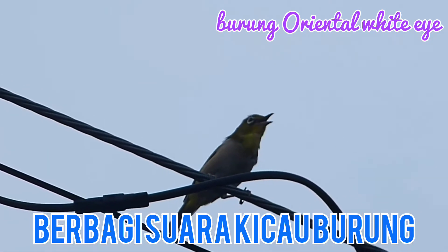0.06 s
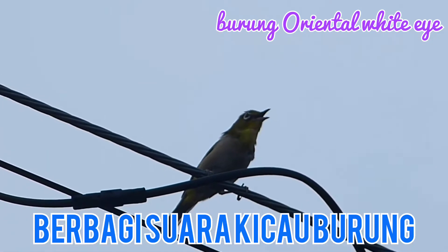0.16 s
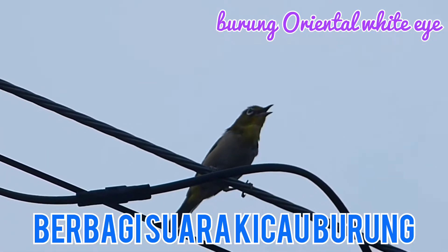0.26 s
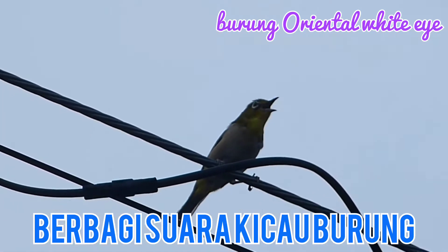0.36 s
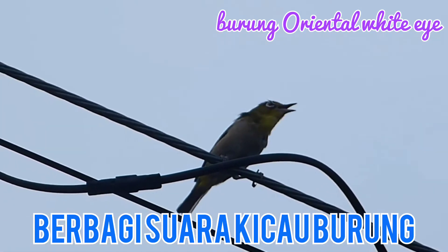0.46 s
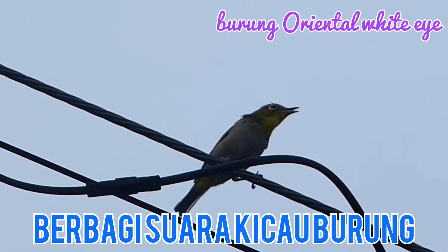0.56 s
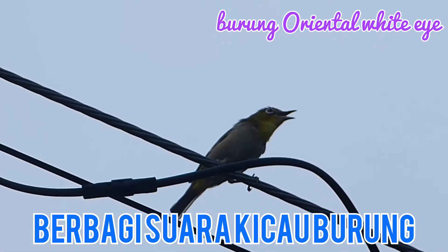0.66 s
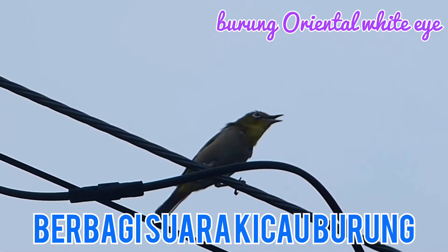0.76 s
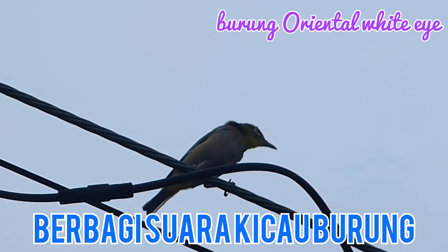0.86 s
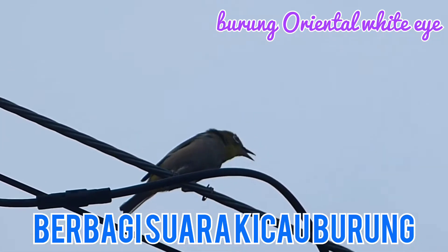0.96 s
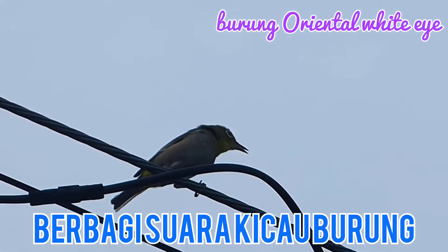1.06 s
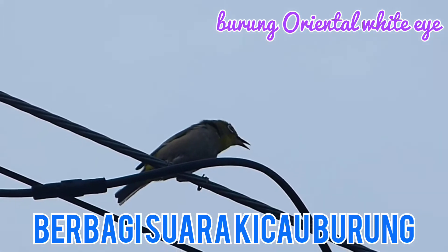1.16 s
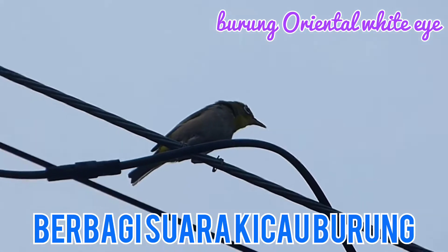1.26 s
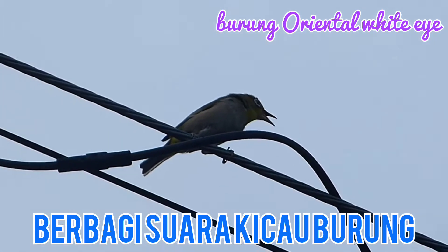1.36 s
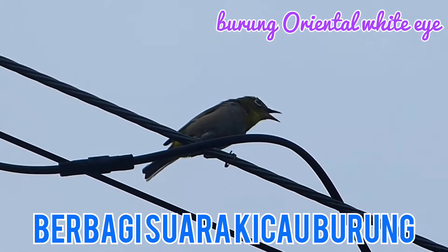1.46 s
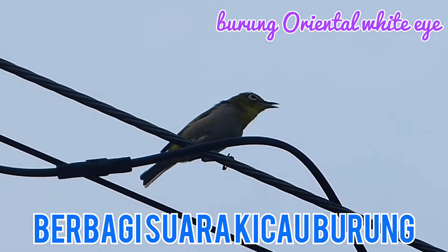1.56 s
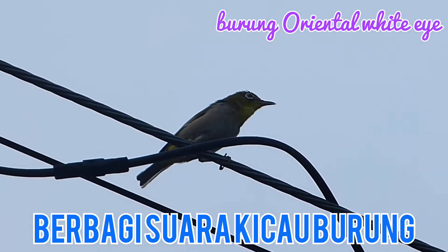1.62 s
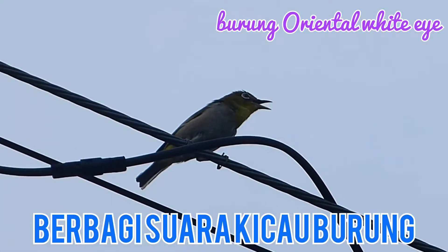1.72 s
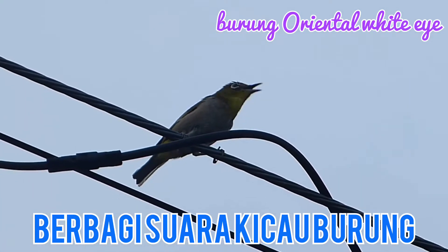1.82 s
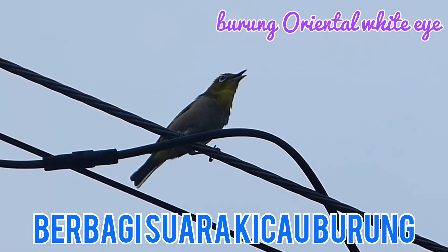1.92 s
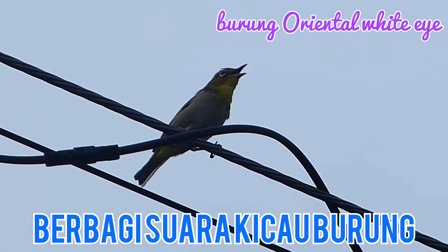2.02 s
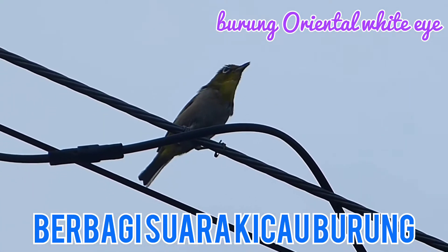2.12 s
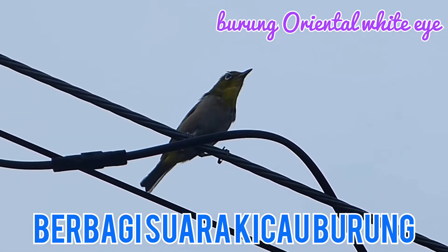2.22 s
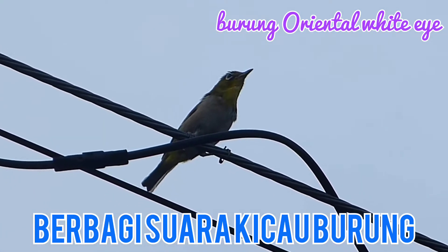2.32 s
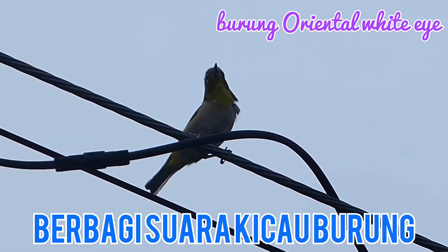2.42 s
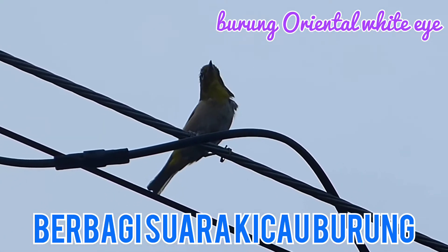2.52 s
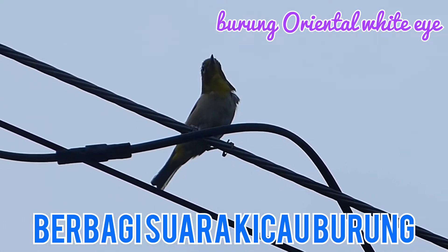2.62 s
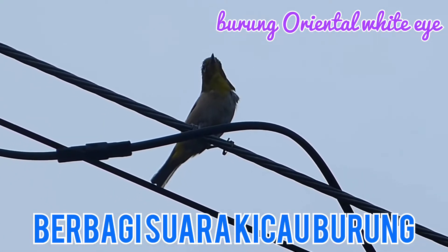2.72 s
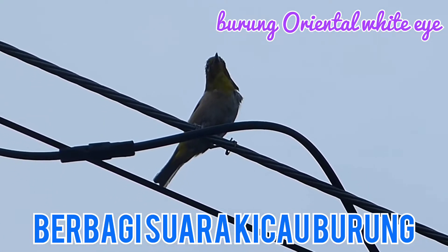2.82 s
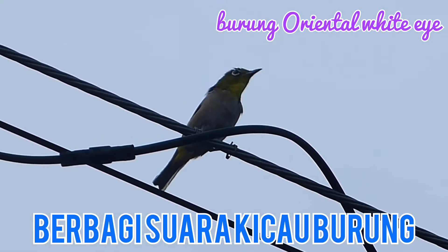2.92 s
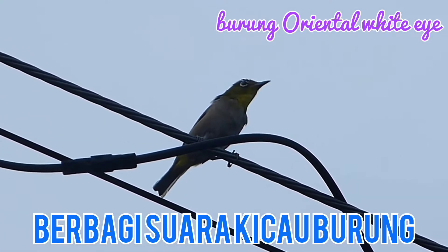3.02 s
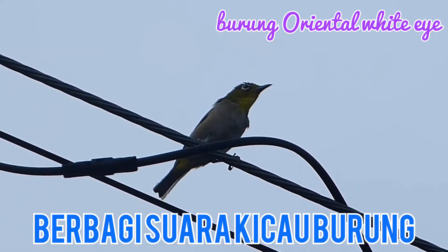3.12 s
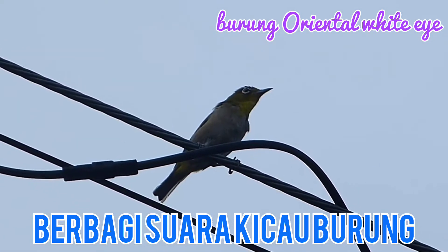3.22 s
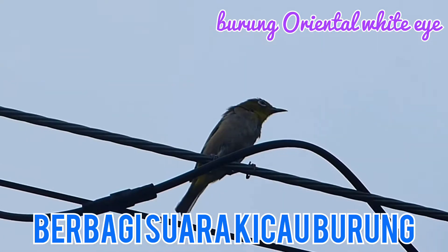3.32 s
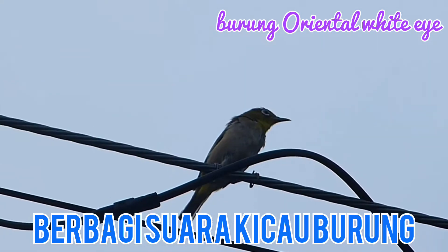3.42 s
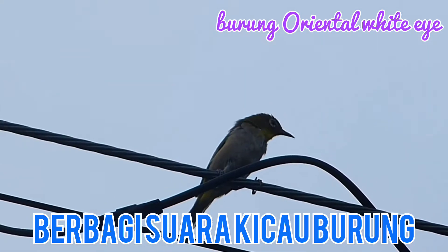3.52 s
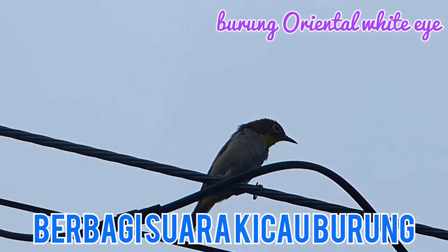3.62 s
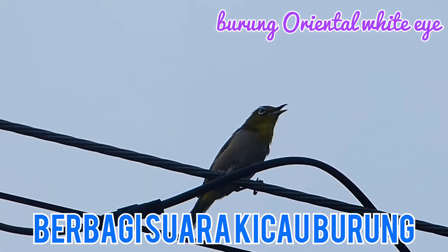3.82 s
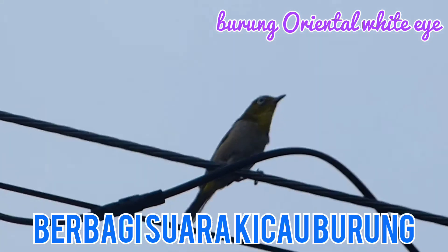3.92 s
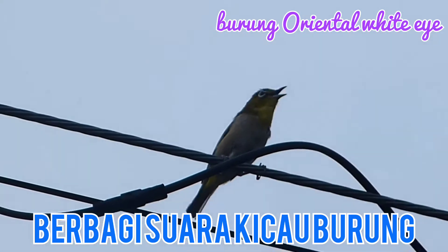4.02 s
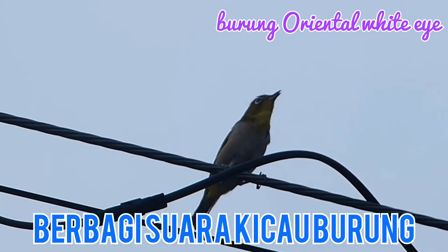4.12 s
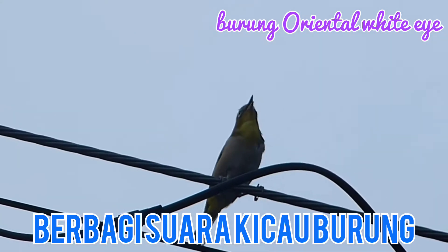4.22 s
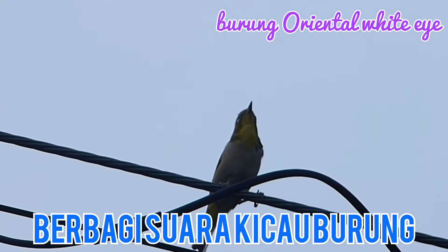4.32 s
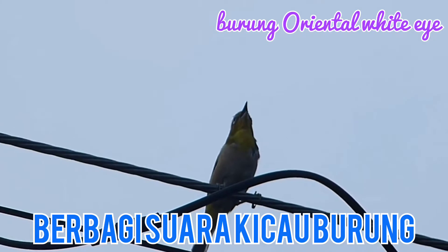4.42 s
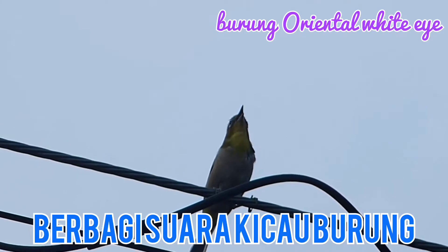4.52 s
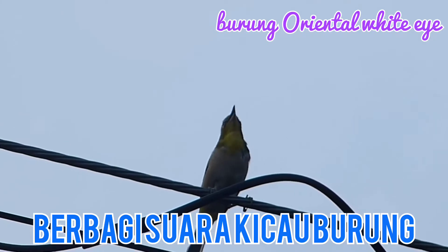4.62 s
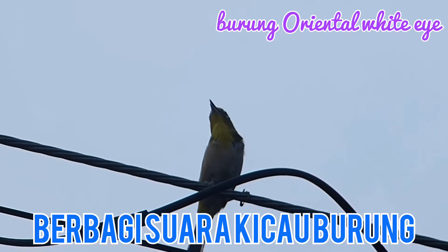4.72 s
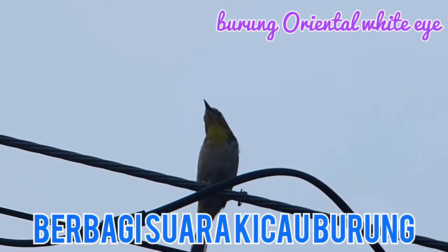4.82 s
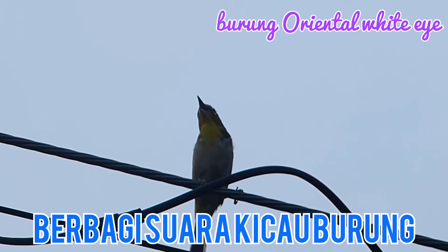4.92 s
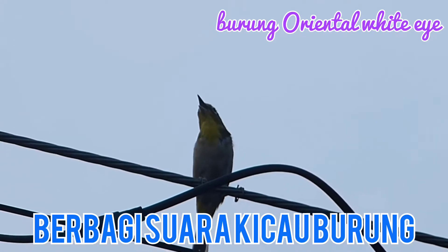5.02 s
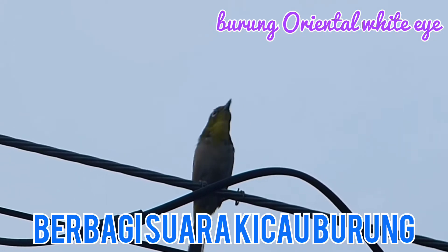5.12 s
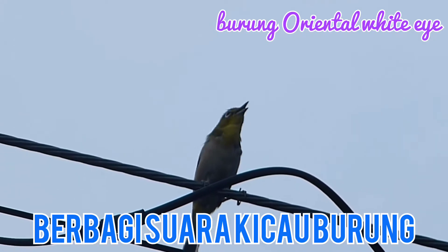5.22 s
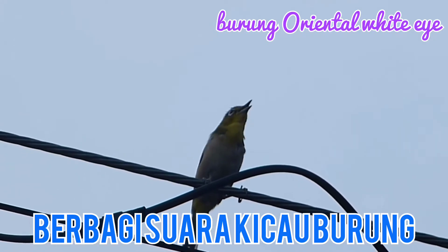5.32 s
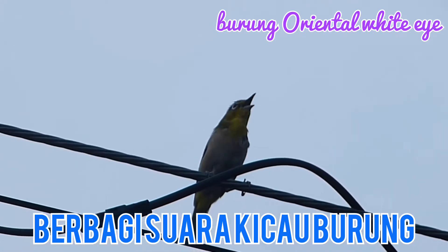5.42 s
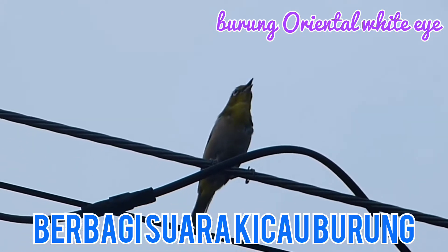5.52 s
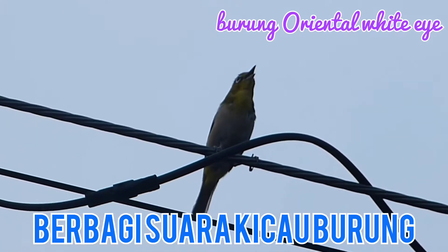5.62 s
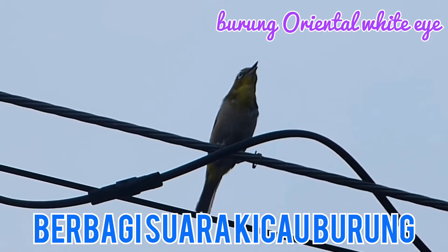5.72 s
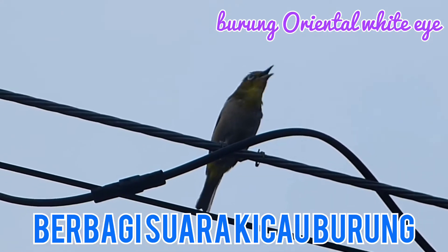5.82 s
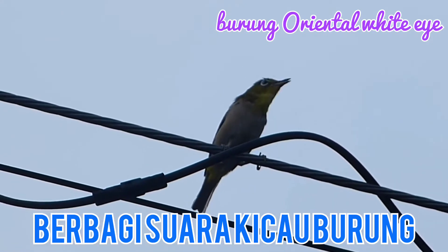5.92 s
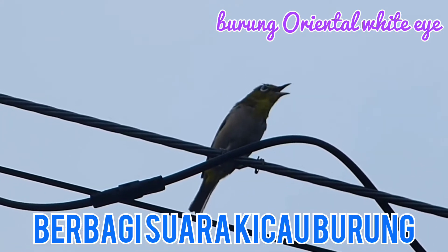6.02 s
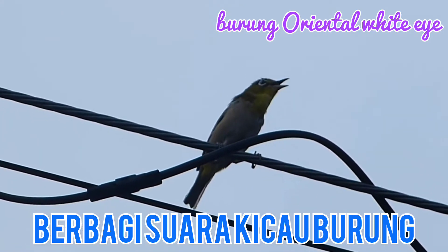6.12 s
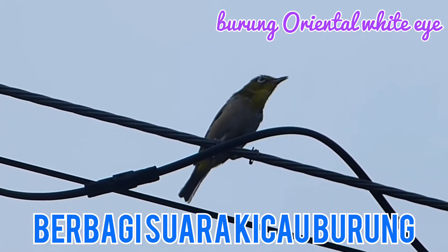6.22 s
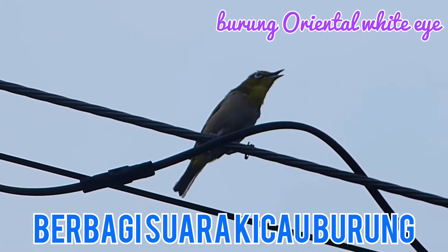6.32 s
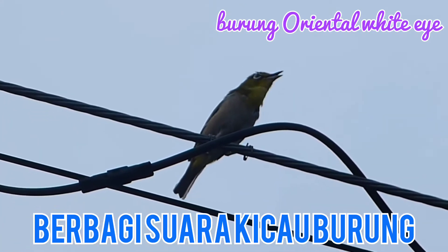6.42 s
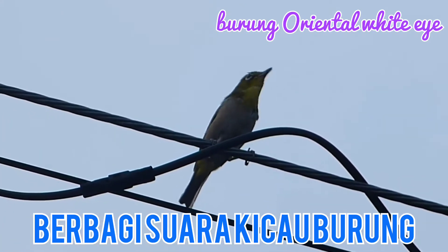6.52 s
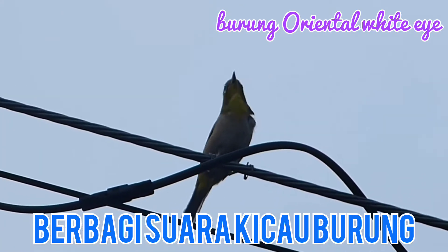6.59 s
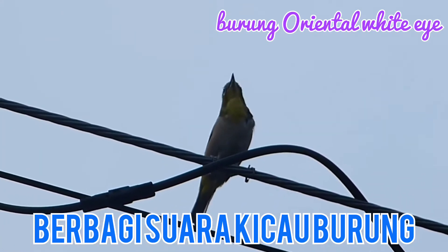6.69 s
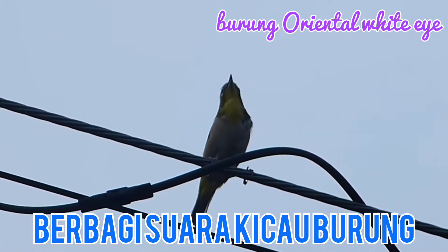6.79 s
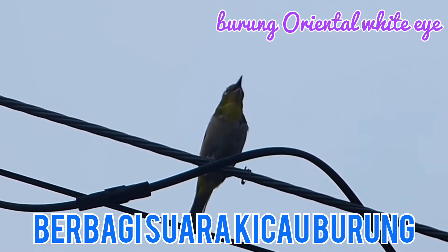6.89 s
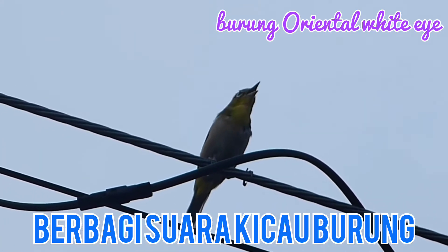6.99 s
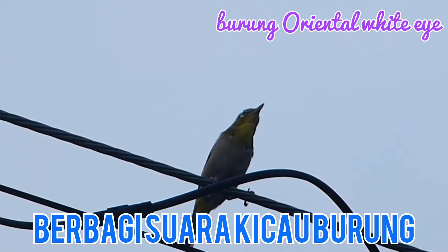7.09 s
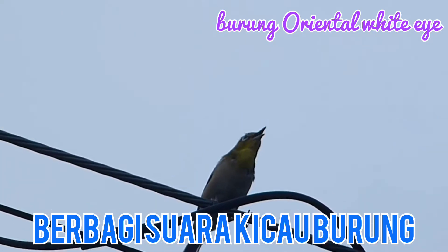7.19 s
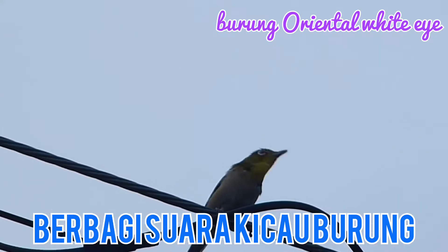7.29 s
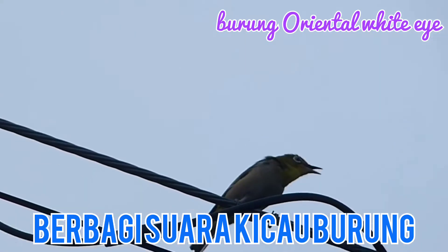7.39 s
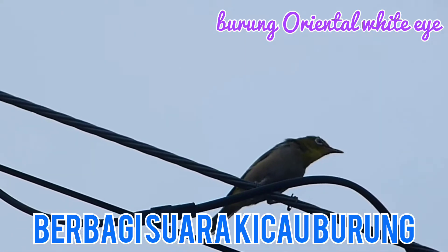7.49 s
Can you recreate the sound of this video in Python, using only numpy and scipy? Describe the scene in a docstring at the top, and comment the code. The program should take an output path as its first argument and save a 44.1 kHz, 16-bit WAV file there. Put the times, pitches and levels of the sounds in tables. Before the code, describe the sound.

A small songbird perched on an overhead wire sings rapid, high, sliding whistles for just over two seconds, pauses about a second and a half, then resumes a longer phrase that runs to the end. Walls and roofs return quick echoes and a thin tail. Behind it lie a quiet wash of distant traffic, a few dry ticks from the camera body and dull far thuds late on.

```python
"""Songbird among houses

A small songbird on an overhead wire sings two phrases of quick, gliding whistles: phase-summed sines
with two faint overtones. Roofs and walls return each note as discrete echoes and decaying noise tails.
Shaped noise gives the hum of distant traffic, far-off rolling thuds and a puff of breeze on the camera;
dry ticks are noise snaps that also ring the damped modes of its housing.
"""
import sys
import numpy as np
from scipy import signal
from scipy.fft import rfft, irfft, next_fast_len
from scipy.io import wavfile
from scipy.ndimage import uniform_filter1d, map_coordinates

SR = 44100
rng = np.random.default_rng(int(sys.argv[2]) if len(sys.argv) > 2 else 0)


def materialize(psi):
    """Save the field psi as 16-bit PCM at rate SR to the path in sys.argv[1].

    A 1-D psi becomes a single channel; in a 2-D psi each row is a channel.
    """
    bounded = np.clip(np.atleast_2d(psi).T, -1, 1)
    quanta = np.round(bounded * 32767).astype(np.int16)
    wavfile.write(sys.argv[1], SR, quanta)


N = 332955

# Distant traffic over time: start_s, rumble_db, rush_db
TRAFFIC_LEVELS = [(0, -57.5, -41), (2.8, -48, -40), (3.8, -51.5, -38.5), (7.55, -54, -40.5)]
# Relative spectra of the low rumble and the broad rush: frequency_hz, density_db_per_hz
RUMBLE_SPECTRUM = [(60, -56), (130, -6), (270, 6), (600, -32.5)]
RUSH_SPECTRUM = [(40, -25), (400, -0.5), (1000, -1), (2600, -11.5), (5000, -12), (7400, -11.5),
                 (11500, -29.5), (15700, -50)]
# Stereo relation of distant noise: frequency_hz, left_right_correlation, left_phase_lead_rad
STEREO_COHERENCE = [(40, 0.2, 0.31), (153, 0.99, 0.039), (520, 0.97, 1), (4000, 0.82, 0.052)]
# Breeze on the ports: middle_s, width_s, level_db
BREEZE_PUFFS = [(.43, 0.48, -46)]
# Relative spectrum of the breeze: frequency_hz, density_db_per_hz
BREEZE_SPECTRUM = [(30, -25), (130, 3), (250, 2), (600, -46)]
# Far thuds, before the knock and roll gains: start_s, level_db
THUD_EVENTS = [(4.946, -36), (5.795, -37), (6.594, -35)]
# Relative spectra of the short knock and the long roll: frequency_hz, density_db_per_hz
KNOCK_SPECTRUM = [(60, -50), (550, 0), (8000, -70)]
ROLL_SPECTRUM = [(30, -55), (140, 0), (3000, -60)]
# Dry ticks, before filter and mode gains: start_s, snap_level_db, ring_level_db
TICK_EVENTS = [(0.388, -13, -25), (1.1113, -34, -14.5), (3.655, -41, -19), (4.4394, -31, -48)]
# Modes of the camera housing, mean levels: frequency_hz, relative_level_db, t60_s
HOUSING_MODES = [(900, 3.5, 0.025), (1270, 9, 0.018), (407, -2.5, 0.033), (2320, 1.5, 0.018)]
HOUSING_RIGHT_GAIN = -1.51  # the housing moves the right port against the left
# Discrete reflections, mean levels: delay_s, level_db
REFLECTIONS = [(.00839, -9), (0.198, -25)]
# Street reverberation, near and far: level_db, t60_s, left_right_correlation, treble_loss_db_per_khz
REVERBERATION = [(-4, 0.2, 0.91, -1), (-12.5, 1.52, 0.93, 1.5)]
LUMPS_DB = 1.5  # the tails come back in lumps, wall by wall
# Pitch path of each note, one list a note: time_s, pitch_hz
NOTE_GLIDES = [
    [(0.0, 7000), (0.025, 4840), (0.032, 3930), (0.038, 4390), (0.052, 3770), (0.09, 3480)],
    [(0.166, 6230), (0.176, 6460), (0.184, 5510), (0.219, 4875), (0.228, 4450), (0.351, 3824)],
    [(0.408, 4280), (0.412, 5030), (0.424, 4740), (0.441, 3650), (0.468, 3260), (0.492, 4240),
     (0.497, 4000)],
    [(0.531, 5350), (0.549, 5820), (0.583, 5620), (0.6, 4515), (0.664, 3890)],
    [(0.742, 5530), (0.767, 6560), (0.78, 7730), (0.794, 4050), (0.808, 6320), (0.819, 6450), (0.83, 4690),
     (0.915, 3754), (0.931, 4030), (0.955, 3905)],
    [(1.051, 4960), (1.067, 5700), (1.115, 4540), (1.124, 4560), (1.135, 4060), (1.186, 3760),
     (1.192, 4170), (1.214, 3770)],
    [(1.256, 4750), (1.284, 5500), (1.296, 5050), (1.303, 4430), (1.392, 3460)],
    [(1.478, 5000), (1.506, 6690), (1.552, 5130), (1.574, 4330), (1.582, 5520), (1.594, 4400),
     (1.647, 4985), (1.669, 4130), (1.734, 3670)],
    [(1.831, 4630), (1.857, 5700), (1.879, 4720), (1.935, 3820)],
    [(1.978, 5500), (1.981, 6540), (1.987, 5584), (2.002, 5326), (2.013, 3890), (2.135, 3467)],
    [(2.172, 3940), (2.2, 5940), (2.23, 4440), (2.275, 4075)],
    [(3.856, 6280), (3.909, 5440)],
    [(3.923, 7030), (3.971, 4340), (3.985, 4510), (4.043, 3460), (4.06, 3400)],
    [(4.129, 4100), (4.14, 6160), (4.15, 5460)],
    [(4.165, 4544), (4.264, 3950)],
    [(4.311, 5360), (4.324, 6250), (4.35, 6350), (4.36, 5180), (4.37, 5160), (4.386, 4086), (4.46, 3618)],
    [(4.517, 5350), (4.53, 7500), (4.543, 5710), (4.612, 5080), (4.626, 4020), (4.631, 4860), (4.648, 4120),
     (4.65, 4304), (4.693, 3840)],
    [(4.771, 4600), (4.778, 5770), (4.802, 4760), (4.888, 3586)],
    [(4.961, 5870), (4.993, 6320), (5.003, 3650), (5.012, 5180), (5.021, 3690), (5.029, 4500),
     (5.045, 3500)],
    [(5.074, 4600), (5.094, 6144), (5.13, 4995), (5.187, 4150), (5.269, 3860)],
    [(5.368, 4720), (5.375, 5410), (5.394, 4215), (5.46, 3925)],
    [(5.483, 4080), (5.493, 4790), (5.511, 4110)],
    [(5.56, 4980), (5.576, 6820), (5.623, 5000), (5.674, 4050), (5.709, 3787)],
    [(5.776, 5140), (5.785, 5770), (5.799, 4110), (5.808, 5250), (5.82, 4250), (5.875, 3810), (5.878, 4070),
     (5.901, 3860)],
    [(5.95, 4000), (5.965, 5980), (5.985, 4050), (5.998, 5350), (6.013, 4210), (6.042, 3820), (6.048, 4120),
     (6.061, 3750)],
    [(6.154, 5300), (6.176, 7180), (6.187, 5470), (6.223, 4360), (6.33, 3997)],
    [(6.417, 4410), (6.42, 5110), (6.504, 3480)],
    [(6.55, 5470), (6.56, 5560), (6.572, 4410), (6.582, 5000), (6.593, 4120), (6.599, 4200), (6.632, 3600)],
    [(6.646, 4040), (6.682, 3525)],
    [(6.79, 5130), (6.796, 6270), (6.807, 5830), (6.823, 4010), (6.941, 3443), (6.952, 3990), (6.957, 3540)],
    [(7.01, 4820), (7.02, 6210), (7.062, 6174), (7.084, 6860), (7.115, 5280), (7.133, 4220), (7.15, 5110),
     (7.158, 4550), (7.194, 4520), (7.22, 4020)],
    [(7.297, 5840), (7.302, 5910), (7.312, 4410), (7.319, 6080), (7.333, 4800), (7.34, 5580), (7.349, 4570),
     (7.356, 4900), (7.392, 3524), (7.435, 3780), (7.442, 3480)],
    [(7.514, 3880), (7.52, 5300), (7.549, 4090)],
]
# Strength of each note before windpipe and swells: level_db, change_by_end_db
NOTE_LEVELS = [(-19.5, -4.5), (-21, 5), (-16.5, -15.5), (-18, -2), (-21.5, 3), (-29.5, 7), (-22, -5),
               (-28, 10), (-22, 2.5), (-19.5, -4), (-24, 7.5), (-39.5, -5), (-28.5, -1.5), (-12, -33),
               (-22, 0), (-21.5, 0), (-22.5, 5.5), (-14.5, -10.5), (-19, -10.5), (-18, 0), (-22.5, 1.5),
               (-26, 5.5), (-19.5, 2), (-22.5, 5), (-20, 1), (-19.5, -9), (-31, -2), (-25.5, 0.5),
               (-12.5, -15.5), (-22, -12), (-20, -3), (-25, 5), (-23, 6)]
# Rounded swells and dips within notes: middle_s, width_s, lift_db
NOTE_SWELLS = [(.491, .025, 16.5), (0.794, 0.13, -6.5), (4.227, 0.052, 8), (5.42, 0.046, 8.5),
               (6.301, 0.056, 14.5), (6.953, 0.043, 13), (7.429, 0.023, 3.5)]
# Stretches of warbling pitch: start_s, end_s, rate_hz, depth_share_of_pitch
NOTE_TRILLS = [(1.305, 1.394, 63, -0.057), (4.787, 4.842, 43.7, -0.048), (4.962, 5, 169.6, 0.049),
               (5.199, 5.267, 46, 0.0285), (6.427, 6.501, 92.3, 0.091)]
# Strength of the whistle by pitch: pitch_hz, gain_db
WINDPIPE_GAIN = [(3200, -9.5), (3900, -5), (5200, 1.5), (6400, 2), (7800, 3)]
ATTACK_S, RELEASE_S = 0.0069, 0.0043
SHAKY_HZ, SHAKE_PER_OCTAVE = 4150, .07  # below this pitch the voice shakes, share of pitch
BAND_LIMIT_HZ = 15740


def amp(db):
    """Decibel law: the amplitude ratio of a level."""
    return 10 ** (np.asarray(db) / 20)


def unit(x):
    """Normalisation of x to a root mean square of 1."""
    return x / np.sqrt(np.mean(x ** 2) + 1e-20)


def along(points, hz, column=1):
    """Linear interpolation of a column of a table over log frequency."""
    table = np.transpose(points)
    return np.interp(np.log(hz + 1), np.log(table[0] + 1), table[column])


def wobble(rate_hz):
    """Band-limited chance: a smooth curve through random knots, rate_hz knots a second."""
    knots = rng.standard_normal(int(N * rate_hz / SR) + 4)
    return map_coordinates(knots, [np.arange(N) * rate_hz / SR])


def hump(t, middle_s, width_s):
    """Raised-cosine window: rises from 0 to 1 at the middle and falls back."""
    return np.cos(np.pi * np.clip((t - middle_s) / width_s, -.5, .5)) ** 2


def filtered(x, response):
    """Linear filtering: the spectrum of x times a response of frequency."""
    m = next_fast_len(N + SR // 2)
    return irfft(rfft(x, m) * response(np.fft.rfftfreq(m, 1 / SR)), m)[..., :N]


def coherent_noise(spectrum, patchy_db):
    """Partial coherence: patchy mid and side noise, rms 1, whose phase leads in the left port."""
    cells = signal.stft(rng.standard_normal((2, N)), nperseg=512)[2]
    field = uniform_filter1d(rng.standard_normal(cells.shape[1:]), size=6, axis=0)
    field = uniform_filter1d(field, size=14, axis=1)
    pair = signal.istft(cells * amp(patchy_db * unit(field)), nperseg=512)[1][:, :N]

    def mid_side_response(hz):
        angle = np.arccos(np.clip(along(STEREO_COHERENCE, hz), -1, 1)) / 2
        return amp(along(spectrum, hz)) * [np.cos(angle), np.sin(angle)]

    def phase_lead(hz):
        return np.exp(.5j * np.outer([1, -1], along(STEREO_COHERENCE, hz, column=2)))

    mid, side = filtered(pair, mid_side_response)
    return unit(filtered(np.array([mid + side, mid - side]), phase_lead))


def traffic():
    """Broadband noise of distant roads: a low rumble and a wide rush, each of slowly varying level."""
    s, rumble_db, rush_db = np.transpose(TRAFFIC_LEVELS)
    t = np.arange(N) / SR
    rumble = amp(np.interp(t, s, rumble_db)) * coherent_noise(RUMBLE_SPECTRUM, patchy_db=3.0)
    swell_db = .7 * wobble(6)
    rush_gain = amp(np.interp(t, s, rush_db) + swell_db)
    return rumble + rush_gain * coherent_noise(RUSH_SPECTRUM, patchy_db=1.58)


def breeze():
    """Turbulent pressure: a light puff of low noise that pushes the two ports apart."""
    t = np.arange(N) / SR
    puffs = sum(amp(db) * hump(t, middle, width) for middle, width, db in BREEZE_PUFFS)
    a, b = filtered(rng.standard_normal((2, N)), lambda hz: amp(along(BREEZE_SPECTRUM, hz)))
    opposed = unit(np.array([a + 0.25 * b, 0.76 * b - a]))
    return puffs * amp(2.7 * wobble(15.0)) * opposed


def thuds():
    """Exponential decay: dull far blows, a short knock and a low roll that dies away unevenly."""
    t = np.arange(N) / SR

    def fading(t60):
        envelope = 0
        for s, db in THUD_EVENTS:
            onset = np.clip((t - s) / 0.0067, 0, 1)
            envelope = envelope + amp(db - 60 * np.maximum(t - s, 0) / t60) * onset
        return envelope

    knock = amp(5.5) * fading(.4) * coherent_noise(KNOCK_SPECTRUM, patchy_db=3)
    roll = amp(-6.5) * fading(3.55) * coherent_noise(ROLL_SPECTRUM, patchy_db=2.5)
    # the short running mean dulls the treble
    return amp(1.6 * wobble(25)) * uniform_filter1d(knock + roll, size=9)


def ticks():
    """Impulse excitation: noise snaps ring damped housing modes, opposed from port to port."""
    bright, body, t = np.zeros((2, N)), np.zeros(N), np.arange(SR // 5) / SR
    for s, snap_db, ring_db in TICK_EVENTS:
        start = round(s * SR)
        snap = rng.standard_normal((3, len(t))) * amp(-60 * t / 0.013)
        # one noise shared by both ports, one of its own for each
        bright[:, start:][:, :len(t)] += amp(snap_db) * (snap[0] + 1.9 * snap[1:])
        modes = np.zeros(len(t))
        for hz, db, t60 in HOUSING_MODES:
            decay = amp(ring_db + db + rng.normal(0, 1.4) - 60 * t / t60)
            modes += decay * np.sin(2 * np.pi * hz * t)
        body[start:][:len(t)] += modes * (1 - np.exp(-t / 0.0018))

    def snap_band(hz):
        centre_hz, width_hz = 4400, 8800
        return (1j * hz * width_hz / (centre_hz ** 2 - hz ** 2 + 1j * hz * width_hz)) ** 2

    return filtered(bright, snap_band) + np.outer([1, HOUSING_RIGHT_GAIN], body)


def street(x):
    """Reflection and scattering: echoes and noise tails, new from note to note as the head turns."""
    out = np.array([x, x])
    t = np.arange(256 * 128) / SR
    khz_above_5 = np.fft.rfftfreq(len(t), 1000 / SR) - 5
    starts = [0] + [round(path[0][0] * SR) for path in NOTE_GLIDES[1:]] + [N]
    for a, b in zip(starts, starts[1:]):
        tail = np.zeros((2, len(t)))
        for delay, db in REFLECTIONS:
            tail[:, round(delay * SR)] = amp(db + rng.normal(0, 0.49))
        for db, t60, alike, loss_db in REVERBERATION:
            lumps_db = LUMPS_DB * np.repeat(rng.standard_normal(size=256), len(t) // 256)
            decay = amp(lumps_db - 60 * t / t60)
            both, apart = rng.standard_normal((2, len(t))) * decay * (t > .0015)
            angle = np.arccos(np.clip(alike, -1, 1)) / 2
            pair = np.cos(angle) * both + np.sin(angle) * apart * [[1], [-1]]
            coloured = irfft(rfft(pair) * amp(-loss_db * khz_above_5))
            tail += amp(db) * coloured / np.linalg.norm(both)
        wet = signal.fftconvolve(x[None, a:b], tail, axes=1)[:, :N - a]
        out[:, a:a + wet.shape[1]] += wet
    return out


def smooth(t, s, v):
    """Monotone cubic interpolation: a rounded curve through (s, v) that never overshoots."""
    h = np.diff(s)
    m = np.diff(v) / h
    # harmonic mean of neighbouring slopes, zero at a turning point
    mean = 2 * m[1:] * m[:-1] / (m[1:] + m[:-1] + 1e-12)
    d = np.r_[m[0], np.where(m[1:] * m[:-1] > 0, mean, 0), m[-1]]
    k = np.clip(np.searchsorted(s, t) - 1, 0, len(h) - 1)
    u = np.clip((t - s[k]) / h[k], 0, 1)
    bend = (3 - 2 * u) * h[k] * (m[k] - d[k]) + (u - 1) * h[k] * (d[k + 1] - d[k])
    return v[k] + u * h[k] * d[k] + u * u * bend


def contour(path, level_db, change_db):
    """Source and resonance: sample indices, gliding pitch in Hz and windpipe-shaped level in dB."""
    s, hz = np.transpose(path)
    i = np.arange(max(round(s[0] * SR), 0), min(round((s[-1] + RELEASE_S) * SR), N))
    t = i / SR
    pitch_hz = np.exp(smooth(t, s, np.log(hz)))
    level = level_db + change_db * (t - s[0]) / (s[-1] - s[0])
    for middle, width, lift_db in NOTE_SWELLS:
        level = level + lift_db * hump(t, middle, width)
    return i, pitch_hz, level + along(WINDPIPE_GAIN, pitch_hz)


def bird():
    """Frequency modulation: each note is a gliding whistle with two faint overtones."""
    voice, clock = np.zeros(N), np.arange(N) / SR
    quiver = 1 + .007 * wobble(300) + .008 * wobble(70)
    for start, end, rate_hz, depth in NOTE_TRILLS:
        active = (clock > start) * (clock < end)
        quiver += depth * np.sin(2 * np.pi * rate_hz * (clock - start)) * active
    flutter_db, rasp_db, shake = 2.2 * wobble(140), 5 * wobble(60), wobble(130)
    for path, note in zip(NOTE_GLIDES, NOTE_LEVELS):
        i, pitch_hz, level_db = contour(path, *note)
        t = clock[i]
        octaves_below = np.clip(np.log2(SHAKY_HZ / pitch_hz), 0, 1)
        shaken = pitch_hz * (quiver[i] + SHAKE_PER_OCTAVE * shake[i] * octaves_below)
        pitch = uniform_filter1d(shaken, size=60)
        phase = 2 * np.pi * np.cumsum(pitch) / SR
        # overtones follow the whistle's strength only in part; low notes keep more of the second
        low = np.log2(5000 / pitch)
        overtones = amp(-58.5 + 21 * low) * np.sin(2 * phase) + amp(-70.0) * np.sin(3 * phase)
        whistle = amp(level_db + flutter_db[i]) * np.sin(phase)
        tone = whistle + amp(0.095 * level_db + rasp_db[i]) * overtones
        edges = np.clip(np.minimum((t - t[0]) / ATTACK_S, (t[-1] - t) / RELEASE_S), 0, 1)
        voice[i] += np.sqrt(2) * edges * tone
    return voice


def scene():
    """Superposition: the bird in its echoes adds to the background sources."""
    return street(bird()) + ticks() + thuds() + traffic() + breeze()


def record(dry):
    """Band limitation: the camera keeps nothing from its upper limit on."""
    return filtered(dry, lambda hz: hz < BAND_LIMIT_HZ)


dry = scene()
out = record(dry)
materialize(out)
```